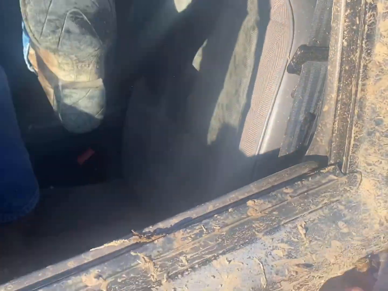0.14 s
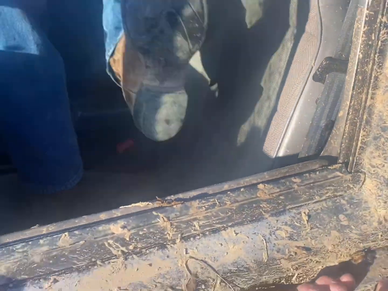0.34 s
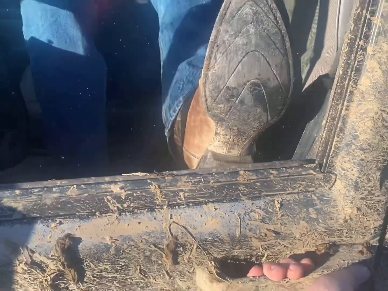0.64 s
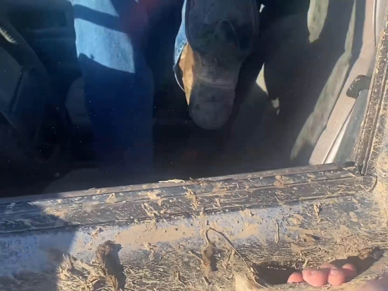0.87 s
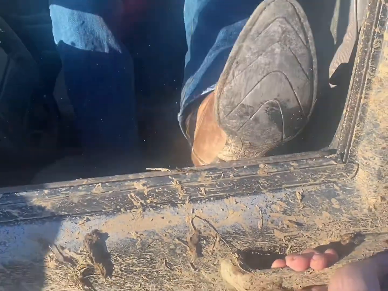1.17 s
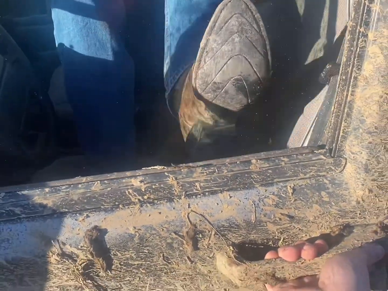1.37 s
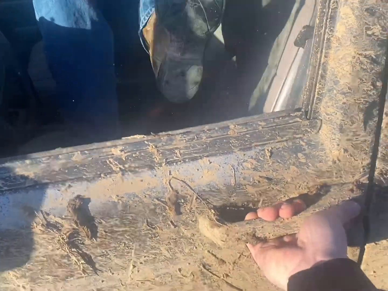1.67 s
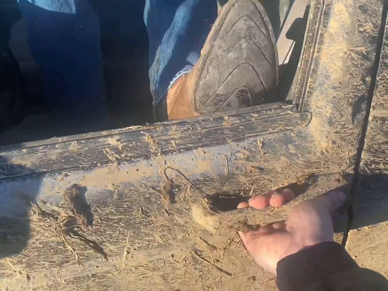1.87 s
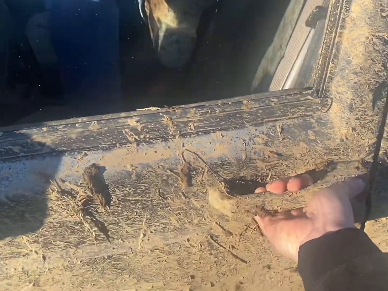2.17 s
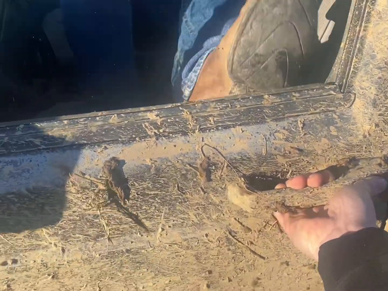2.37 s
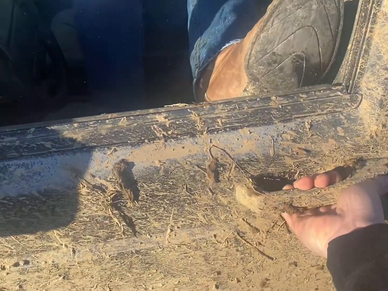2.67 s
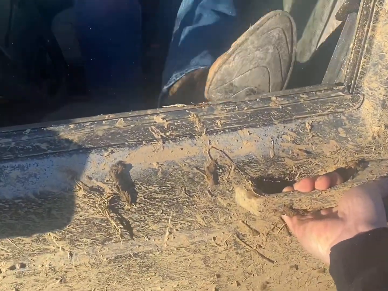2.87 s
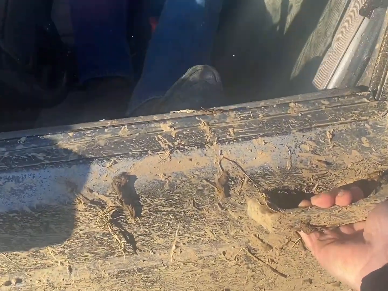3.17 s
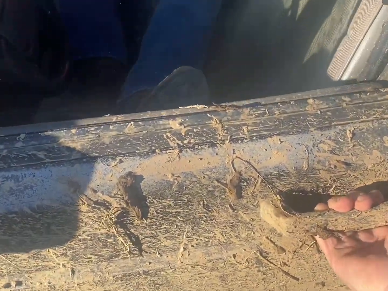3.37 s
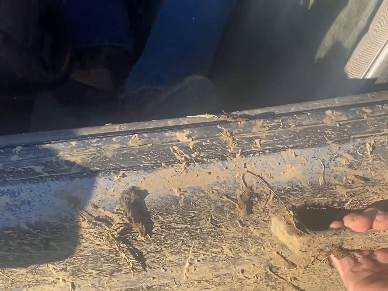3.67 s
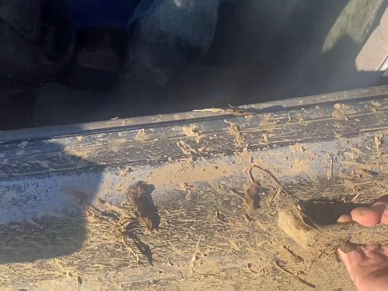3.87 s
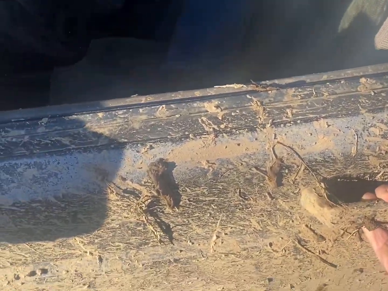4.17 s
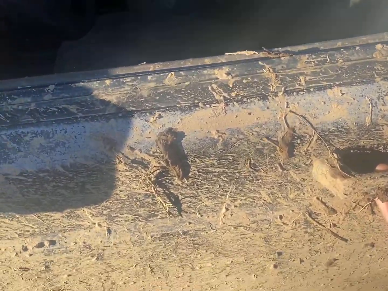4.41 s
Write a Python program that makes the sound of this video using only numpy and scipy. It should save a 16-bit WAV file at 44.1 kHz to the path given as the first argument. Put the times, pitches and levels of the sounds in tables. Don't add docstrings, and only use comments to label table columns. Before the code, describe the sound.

Close stereo pickup, the loud hits squeezed by limiting: four heavy boot kicks on hollow, dirt-caked sheet metal, the third hardest and sharpest, the last boomy. Trim buzzes, the panel rocks and crumbs patter down. Then the kicking stops, leaving gritty foot shuffles, small knocks, faint rubber squeaks and cloth rustle over a low unsteady engine drone.

```python
import sys
import numpy as np
from scipy import signal
from scipy.fft import rfft, irfft
from scipy.io import wavfile
from scipy.ndimage import uniform_filter1d

SR = 44100
rng = np.random.default_rng(int(sys.argv[2]) if len(sys.argv) > 2 else 0)


def magnitude_from_level(level_db):
    exponent = np.asarray(level_db, float) / 20
    return 10 ** exponent


def unload_wav(signal):
    wavfile.write(
        sys.argv[1],
        SR,
        np.round(np.clip(np.atleast_2d(signal).T, -1, 1) * 32767).astype(np.int16),
    )


N = 200346

# t [s], firing f [Hz], second-order level [dB]
ENGINE_RUN = [(0, 64.5, -25), (.07, 68.21, -34.5), (.13, 75.45, -41), (.3, 80.27, -34), (.6, 84.07, -37.5),
              (1.0, 84.1, -32), (1.3, 77.32, -46.5), (1.6, 74, -44), (2.0, 71.1, -52.5),
              (2.26, 70.75, -49.5), (2.77, 65.74, -49.5), (3.0, 60.52, -44), (3.27, 58.52, -45.5),
              (3.57, 55.8, -40), (3.8, 58.57, -38), (4.07, 62.73, -33), (4.3, 62.77, -32.5),
              (4.54, 67.2, -35.5)]
# multiple of firing f [1], level [dB]
UPPER_ORDERS = [(1.5, -50.5), (3, -46), (4, -57), (5, -57.5)]
# f [Hz], level [dB per Hz]
RUMBLE_SPECTRUM = [(20, -25.5), (32, -10.5), (55, 9), (90, 2.5), (150, -1), (250, -48)]
# f [Hz], level [dB per Hz]
DRONE_SPECTRUM = [(110, -29), (190, -3.5), (330, -2), (480, -22), (700, -9.5), (1100, -51.5)]
# f [Hz], level [dB per Hz]
SCUFF_SPECTRUM = [(260, -30), (450, -12.5), (530, 0), (1020, -8), (1450, -6.5), (3180, -16.5), (3500, -27),
                  (4550, -55.5), (7700, -120)]
# f [Hz], level [dB per Hz]
CLOTH_SPECTRUM = [(2000, -30.5), (2700, -8), (3500, -1), (4400, -6.5), (7000, -9.5), (9000, -20),
                  (12000, -11), (15500, -15.5), (17000, -60)]
# t [s], length [s], scuff level [dB], cloth level [dB]
MOVES = [(0, 0.012, -46.5, -56.5), (0.041, 0.15, -58, -70), (.17, 0.16, -58, -69),
         (0.289, 0.088, -52.5, -57.5), (0.601, 0.082, -49, -65), (0.707, 0.019, -54, -71),
         (0.756, 0.08, -55.5, -66), (0.843, 0.42, -62, -73.5), (1.454, 0.052, -52, -80),
         (1.526, 0.12, -60, -67.5), (1.628, 0.088, -69.5, -71), (2.122, 0.17, -69, -72.5),
         (2.585, 0.37, -67.5, -75.5), (2.92, 0.16, -61, -71), (3.059, 0.165, -69, -70.5),
         (3.328, 0.1, -65, -81), (3.494, 0.13, -61, -69.5), (3.624, 0.19, -58.5, -66),
         (3.733, 0.042, -54, -61.5), (3.803, .125, -59.5, -62.5), (3.96, 0.34, -67, -73),
         (4.332, .14, -72, -76)]
# t [s], length [s], f [Hz], level [dB]
SCRAPES = [(0.214, 0.031, 4430, -59), (1.469, 0.009, 486, -36.5), (2.789, 0.034, 4300, -65),
           (2.844, 0.035, 2980, -65), (2.926, 0.046, 3210, -55), (2.92, 0.028, 1273, -58),
           (3.156, 0.058, 1000, -51.5), (3.149, 0.063, 672, -55), (3.258, 0.029, 1820, -68),
           (3.331, 0.043, 4180, -71), (3.512, 0.065, 3950, -61.5), (3.513, 0.072, 2680, -65),
           (3.753, 0.055, 3350, -67), (4.362, 0.031, 4220, -72)]
# t [s], peak level [dB], f [Hz], t60 [s]
TAPS = [(0.22, -37, 640, 0.039), (1.427, -55.5, 956, 0.051), (1.461, -25, 1315, 0.047),
        (1.471, -41, 608, 0.023), (2.675, -35, 667, 0.079), (2.689, -33, 678, 0.05),
        (2.742, -43.5, 1020, 0.083), (2.807, -36.5, 1254, 0.02), (3.13, -57.5, 625, 0.0485),
        (3.179, -40, 880, 0.11), (3.207, -38.5, 840, 0.08), (3.26, -34, 1173, 0.064),
        (3.556, -40, 1070, 0.041), (3.595, -43, 640, 0.05), (3.631, -48, 596, 0.042),
        (3.683, -29.5, 1160, 0.054), (3.741, -40.5, 829, 0.098), (3.853, -50, 903, 0.15),
        (4.101, -44.5, 583, 0.029), (4.204, -57, 735, 0.03), (4.289, -43.5, 840, 0.055)]
# t [s], levels of peak, boom, panel, crack [dB]
KICKS = [
    (.355, 0, -7.5, -1.5, -15.5),
    (1.026, -5, -9, 0, -16.5),
    (1.682, 2.5, -12.5, 0.5, -11),
    (2.2948, -1, -8.5, -3, -16),
]
# t after blow [s], peak level [dB]
BOUNCES = [
    (.014, -4.5),
    (.026, -5),
    (.044, -4),
    (.056, -7.5),
    (.075, -17.5),
]
# t after blow [s], peak level [dB], top-end level [dB]
TRIM_SLAPS = [
    (.014, -20, -23.5),
    (.034, -16.5, -24.5),
    (.054, -19.5, -25.5),
    (.075, -24.5, -25.5),
    (.103, -29, -24),
    (.137, -39, -25.5),
    (.189, -40.5, -29),
]
# t [s], peak level [dB]
STRAY_SLAPS = [
    (.409, -19.5),
    (.4297, -14),
    (.4563, -25.5),
    (.6132, -48),
    (.752, -53),
    (1.328, -45),
    (1.716, -11),
    (1.902, -38),
    (2.369, -21),
    (2.4838, -44),
]
# f [Hz], level [dB per Hz]
CLATTER_SPECTRUM = [(24, -38), (40, -18.5), (85, -1), (120, -4.5), (225, -11.5), (350, -5), (450, -19.5),
                    (800, -18), (1700, -29), (3600, -27.5), (8000, -45), (11500, -46.5), (14500, -46),
                    (16000, -56), (17000, -80)]
# f [Hz], t60 [s]
CLATTER_T60 = [(50, 0.24), (150, 0.38), (400, 0.31), (1000, 0.25), (3000, 0.21), (7000, 0.2), (12000, .13)]
# f [Hz], level [dB], t60 [s]
PANEL_MODES = [(99, 1, 0.12), (172, -12, 0.77), (288.4, 1, 0.12), (369.6, 3.5, 0.18), (608, -5, 0.27),
               (665, -5.5, 0.34), (797, -5.5, 0.35), (776, -13, 0.18), (829, -7.5, 0.1),
               (242.8, 1.5, 0.057), (340.2, 0.5, 0.13), (529, -8, 0.055), (1080, -27.5, 0.035),
               (1292, -21, 0.29)]
# t after blow [s], peak level [dB], f [Hz]
ROCKS = [
    (.05, -10.5, 63.4),
    (.202, -17.5, 50.3),
    (.395, -25, 50),
    (.52, -31.5, 62.4),
]
# t [s], peak level [dB], f [Hz]
NUDGES = [
    (0.656, -21, 53),
    (1.733, -14.5, 66.4),
    (2.691, -26.5, 74.5),
]
# t [s], peak level [dB], f [Hz], t60 [s]
THUMPS = [
    (2.674, -23.5, 172, 0.025),
    (3.017, -32, 140, 0.04),
    (3.493, -30, 166, 0.099),
    (3.647, -10.5, 251, 0.012),
    (3.85, -27.5, 166, 0.021),
]
# f [Hz], correlation [1]
LIKENESS = [(60, .985), (380, .95), (950, .4), (2400, .68), (6000, .74), (8500, .995), (15000, .995)]
# f [Hz], lead [rad]
PORT_LEAD = [(0, 0), (950, .8), (2070, 0), (3100, .6), (5500, .2), (7500, -.2), (9000, -3.1), (11200, -6.3),
             (13200, -9.4), (15200, -12.6), (17000, -14)]
# f [Hz], level difference [dB]
PORT_BALANCE = [(60, 0), (200, -.5), (380, -.8), (700, 0), (1290, 1), (2380, 2.2), (4400, 1.5), (8120, -.5),
                (15000, -.7)]

IDLE_HZ = 60
FIRST_ORDER, ODD_ORDERS, EVEN_ORDERS = (-48.0, 0.49), (-5.5, -0.58), (-7.5, 0.3)
BODY_RUMBLE, BODY_DRONE = (-46.5, 0.56), (-60.5, .45)
THROTTLE_DB_PER_HZ_S = 0.2534
# (peak level/dB, t after/s, half width/s)
SHUDDER_LOW, SHUDDER_HIGH = (-32.5, 0.24, .11), (-39, .17, 0.09)
SOLE_SHAKES_DB = 2
AIR_DB, STIR_DB, STIR_HISS_DB = -85.5, -80.5, -79.5
SWELL_S, DIE_S = 0.029, 0.15
SETTLE_DB, SETTLE_DB_PER_S, SETTLE_HISS_DB = -39.5, 80, -11.5
CRUMBS_PER_S, CRUMB_SIZE = 120, .6
BRUSH_DB, MUD_LOST_DB = -11, 5
UNEVEN_S, UNEVEN_DB = .0015, 2.5
BOOM_HZ, BOOM_T60_S, BOOM_LAG_S, BOOM_DB = 98.0, .14, .008, 10.5


def rms_one(x):
    return x / np.sqrt(np.mean(x ** 2) + 1e-20)


def in_time(rows):
    s, *columns = np.transpose(rows)
    return [np.interp(np.arange(N) / SR, s, column) for column in columns]


def at_hz(points, hz):
    f, value = np.array(points)[:, 0], np.array(points)[:, 1]
    return np.interp(np.log(hz), np.log(f + 1), value)


def drift(rate):
    r = np.exp(-80 * np.pi * rate / SR)
    noise = rng.standard_normal(N // 40 + 2002)
    slow = signal.lfilter([1], [1, -2 * r, r * r], noise)[2000:]
    return np.interp(np.arange(N) / 40, np.arange(len(slow)), rms_one(slow))


def band_pass(x, order, low, high):
    return signal.sosfilt(signal.butter(order, [low, high], "band", fs=SR, output="sos"), x)


def low_pass(x, hz):
    return signal.sosfilt(signal.butter(2, hz, fs=SR, output="sos"), x)


def clicks(times, heights):
    out = np.zeros(N) + 1e-18
    np.add.at(out, (np.asarray(times) * SR).astype(int), heights)
    return out


def ring(x, hz, t60):
    r, w = magnitude_from_level(-60 / (t60 * SR)), 2 * np.pi * hz / SR
    return signal.lfilter([0, np.sin(w)], [1, -2 * r * np.cos(w), r * r], x)


def fade(x, t60):
    return signal.lfilter([1], [1, -magnitude_from_level(-60 / (t60 * SR))], x)


def crumbling(per_s, size, t60):
    return fade((rng.random(N) < per_s / SR) * rng.exponential(size, N), t60)


def bands(spectrum, envelope):
    edges = 22 * 2 ** np.arange(0, 9.7, .5)
    centres = np.sqrt(edges[:-1] * edges[1:])
    power = magnitude_from_level(at_hz(spectrum, centres)) ** 2 * np.diff(edges)
    out, white = 0, rng.standard_normal((2, 2, N))
    for k, hz in enumerate(centres):
        if spectrum[0][0] < hz < spectrum[-1][0]:
            mid, side = band_pass(white[k % 2], 2, edges[k], edges[k + 1])
            alike = np.clip(at_hz(LIKENESS, hz), 0, 1)
            pair = np.sqrt(1 + alike) * mid + np.sqrt(1 - alike) * side * [[1], [-1]]
            out = out + rms_one(pair) * np.sqrt(power[k] / power.sum()) * envelope(hz)
    return out


def disperse(x, spread, count):
    return signal.sosfilt(np.tile([-spread, 1, 0, 1, -spread, 0], (count, 1)), x)


def after_blows(pattern):
    rows = np.array([(kick[0] + row[0], *row[1:]) for kick in KICKS for row in pattern])
    rows[:, :2] += rng.normal(0, 1, (len(rows), 2)) * [UNEVEN_S, UNEVEN_DB]
    return rows


def with_revs(law):
    return law[0] + law[1] * (in_time(ENGINE_RUN)[0] - IDLE_HZ)


def engine():
    hz, second_db = in_time(ENGINE_RUN)
    first_db = with_revs(FIRST_ORDER) + .2 * (second_db - second_db.mean())
    odd_db, even_db = with_revs(ODD_ORDERS), with_revs(EVEN_ORDERS)
    climb = np.clip(uniform_filter1d(np.gradient(hz) * SR, size=9000), 0, None)
    phase = 2 * np.pi * np.cumsum(hz * (1 + 0.006 * drift(20))) / SR
    out = magnitude_from_level(first_db + 3.5 + 0.69 * drift(8.1)) * np.sin(phase + .5 * drift(24))
    out += magnitude_from_level(second_db + 4.0 + 0.77 * drift(8.6)) * np.sin(2 * phase)
    for order, db in UPPER_ORDERS:
        load_db = odd_db if order in (3, 5) else even_db
        bark_db = THROTTLE_DB_PER_HZ_S * climb * (order == 4)
        level = magnitude_from_level(db + load_db + bark_db + 2.5 * drift(10))
        out += level * np.sin(order * phase + .3 * drift(10))
    return out


def shudder(db, delay, width):
    since = np.arange(N) / SR - np.array(KICKS)[:, :1]
    return magnitude_from_level(db) * np.exp(-((since - delay) / width) ** 2).sum(axis=0)


def stirring():
    t = np.arange(N) / SR
    trickle = fade(clicks(np.array(KICKS)[:, 0], magnitude_from_level(SETTLE_DB)), 60 / SETTLE_DB_PER_S)
    out = magnitude_from_level(np.array([[STIR_DB], [STIR_HISS_DB]])) + trickle * [[1], [magnitude_from_level(SETTLE_HISS_DB)]]
    for s, length, *db in MOVES:
        edges = np.minimum((t - s) / SWELL_S, (s + length - t) / DIE_S)
        out += np.outer(magnitude_from_level(np.array(db)), np.clip(edges + .5, 0, 1) ** 2)
    return out


def body_vibration(sole):
    rumble_gain = magnitude_from_level(with_revs(BODY_RUMBLE)) + shudder(*SHUDDER_LOW)
    drone_gain = magnitude_from_level(with_revs(BODY_DRONE)) + shudder(*SHUDDER_HIGH) + magnitude_from_level(SOLE_SHAKES_DB) * sole
    rumble = rumble_gain * bands(RUMBLE_SPECTRUM, lambda hz: magnitude_from_level(0.66 * drift(16)))
    return rumble + drone_gain * bands(DRONE_SPECTRUM, lambda hz: magnitude_from_level(0.73 * drift(28)))


def scuffing(sole, cloth):
    grain = np.clip(drift(27), -2, 2)
    crumbs = 1 + crumbling(CRUMBS_PER_S, CRUMB_SIZE, .015)
    scuff = bands(SCUFF_SPECTRUM, lambda hz: magnitude_from_level(1.5 * grain + 2.5 * drift(12)))
    hiss = bands(CLOTH_SPECTRUM, lambda hz: magnitude_from_level(1.5 * grain + 2 * drift(12)))
    return (sole * crumbs + magnitude_from_level(AIR_DB)) * scuff + (cloth * crumbs + magnitude_from_level(AIR_DB - 3.0)) * hiss


def scrapes():
    out = np.zeros(N)
    for s, length, hz, db in SCRAPES:
        at, size = int(s * SR), int(length * SR)
        once = ring(rng.standard_normal(SR // 4), hz, 26.0 / hz)
        squeak = ring(once, hz, 26.0 / hz)[-size:]
        out[at:at + size] += magnitude_from_level(db) * rms_one(squeak) * np.sqrt(np.hanning(size))
    return out


def taps():
    out = np.zeros(N)
    t = np.arange(int(.2 * SR)) / SR
    for s, db, hz, t60 in TAPS:
        at = int((s - .001) * SR)
        noise = rng.standard_normal(len(t)) * magnitude_from_level(-60 * t / t60) * np.minimum(t / 0.0011, 1)
        puff = 7.9 * (t == 0) + noise
        knock = ring(puff, hz, 20.6 / hz) * magnitude_from_level(-19.5)
        knock += band_pass(puff, 2, .4 * hz, 3.5 * hz) * magnitude_from_level(-26.5)
        knock += np.diff(puff, prepend=0) * magnitude_from_level(-60 * t / .012 - 30.0)
        out[at:at + len(t)] += magnitude_from_level(db - 4.0) * knock[:N - at]
    return out


def clatter():
    s, peak_db, boom_db, panel_db, crack_db = np.transpose(KICKS)
    strengths_db = np.transpose([db - np.mean(db) for db in (boom_db, panel_db, peak_db, crack_db)])
    strays = [(*clod, -20.0) for clod in STRAY_SLAPS]
    slap_s, slap_db, top_db = np.transpose([*after_blows(TRIM_SLAPS), *strays])
    since = np.arange(N) / SR - s[:, None]
    brush_db = (BRUSH_DB - MUD_LOST_DB * np.arange(len(s)))[:, None]
    brush = ((since < 0) * magnitude_from_level(np.minimum(since, 0) * 1500.0 + brush_db)).sum(axis=0)
    grit = crumbling(120, .9, .02)

    def envelope(hz):
        level_db = np.array([np.interp(np.log(hz), np.log([80, 300, 600, 4000]), row)
                             for row in strengths_db])
        blows = clicks(s, magnitude_from_level(level_db - 4.5))
        treble = np.clip(np.log2(hz / 500) / 4.53, 0, 1)
        crunch = magnitude_from_level(3 * np.clip(drift(40), -2, 2)) * (1 + grit * (hz > 700))
        body = fade(blows, at_hz(CLATTER_T60, hz)) * crunch
        crack = (magnitude_from_level(13.5) * treble + magnitude_from_level(19.5) * (hz > 6000)) * fade(blows, 0.0053)
        slaps = clicks(slap_s, magnitude_from_level(slap_db + (top_db - top_db.mean()) * (hz > 8000)))
        struck = body + crack + magnitude_from_level(11.5) * treble * fade(slaps, 0.012)
        return signal.lfilter([.08], [1, -.92], struck) + brush * (hz > 400)
    return bands(CLATTER_SPECTRUM, envelope)


def panel():
    s, peak_db, boom_db, panel_db = np.transpose(KICKS)[:4]
    push = band_pass(clicks(s, magnitude_from_level(peak_db + 24.0)), 1, 70.0, 900.0)
    bounce_s, bounce_db = after_blows(BOUNCES).T
    push += band_pass(clicks(bounce_s - .005, magnitude_from_level(bounce_db + 28.0)), 2, 90.0, 450.0)
    luck = rng.normal(0, 1, (len(s), len(PANEL_MODES), 2))
    for at, level_db, row in zip(s, panel_db, luck):
        for (hz, db, t60), (louder, higher) in zip(PANEL_MODES, row):
            strike = clicks([0], magnitude_from_level(level_db + db - 7.0 + 4 * louder))[:SR // 2]
            mode = ring(strike, hz * (1 + .04 * higher), min(t60, .15))
            push[int(at * SR):][:SR // 2] += mode
    return push


def boom():
    s, peak_db, boom_db = np.transpose(KICKS)[:3]
    blows = clicks(s + BOOM_LAG_S, magnitude_from_level(boom_db + BOOM_DB))
    return low_pass(ring(blows, BOOM_HZ, BOOM_T60_S), 260.0)


def rocking():
    swings = [*after_blows(ROCKS), *NUDGES]
    return low_pass(sum(ring(clicks([s], magnitude_from_level(db + 2.5)), hz, 0.23) for s, db, hz in swings), 90.0)


def thumps():
    rings = sum(ring(clicks([s - .002], magnitude_from_level(db + 5.5)), hz, t60 * 0.8) for s, db, hz, t60 in THUMPS)
    return band_pass(rings, 3, 130.0, 420.0)


def scene():
    sole, cloth = stirring()
    background = engine() + body_vibration(sole) + scuffing(sole, cloth)
    feet = scrapes() + disperse(thumps() + taps(), 0.95, count=4)
    door = disperse(clatter() + panel(), 0.98, count=11) + boom() + rocking()
    return background + feet + door


def top_cut(x):
    return signal.sosfilt(signal.butter(12, 17060, fs=SR, output="sos"), x)


def record(dry):
    hz = np.arange(N // 2 + 1) * SR / N
    lead = np.interp(hz, *np.transpose(PORT_LEAD))
    half = magnitude_from_level(at_hz(PORT_BALANCE, hz + 1) / 2) * np.exp(.5j * lead)
    bass_edge = 1 + (26 / (hz + 1)) ** 3
    x = irfft(rfft(dry) * [half, 1 / half] / bass_edge, N)
    over_db = np.maximum(20 * np.log10(np.abs(x).max(axis=0) + 1e-9) + 0.3, 0)
    release_db = 220.0 * np.arange(N) / SR
    held_db = np.maximum.accumulate(over_db + release_db) - release_db
    x = x * magnitude_from_level(-uniform_filter1d(held_db, size=45))
    top_edge = 1 + (hz / 15700) ** 50
    mix = irfft(rfft(np.clip(x, -.9, .9)) / top_edge, N)
    return top_cut(mix)


dry = scene()
out = record(dry)
unload_wav(out)
```